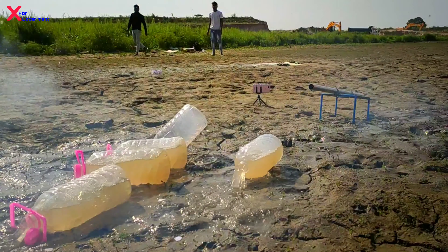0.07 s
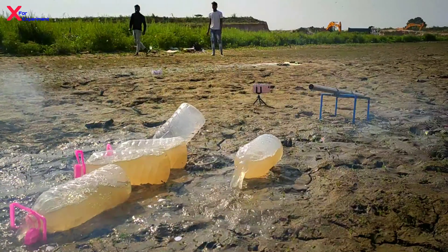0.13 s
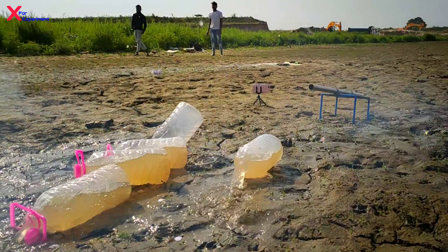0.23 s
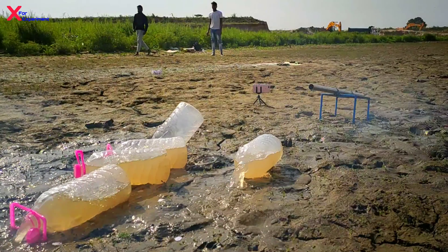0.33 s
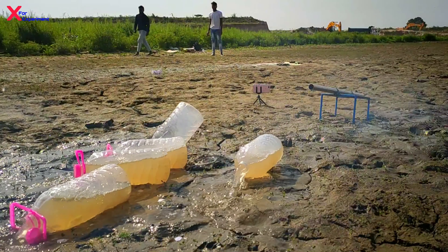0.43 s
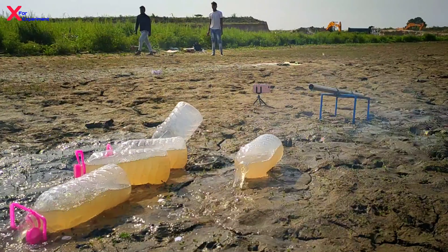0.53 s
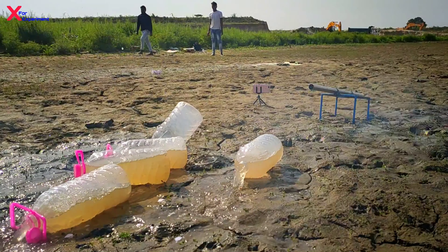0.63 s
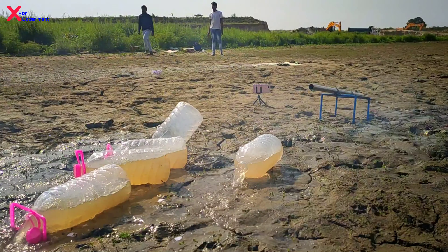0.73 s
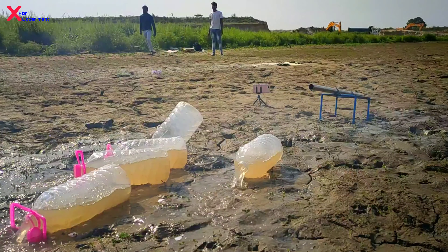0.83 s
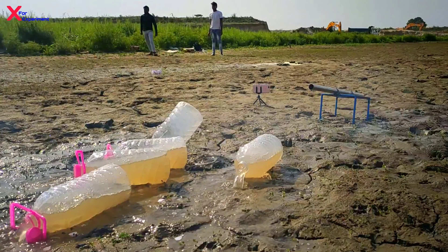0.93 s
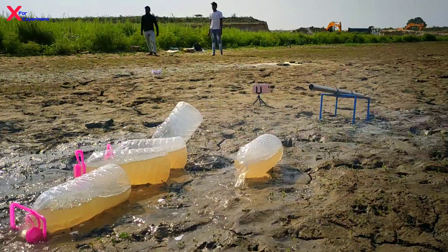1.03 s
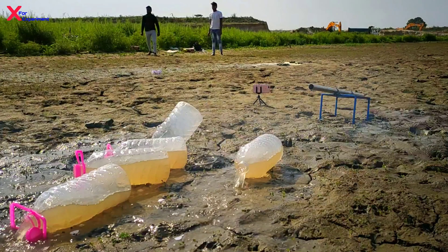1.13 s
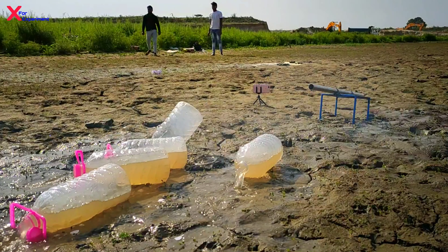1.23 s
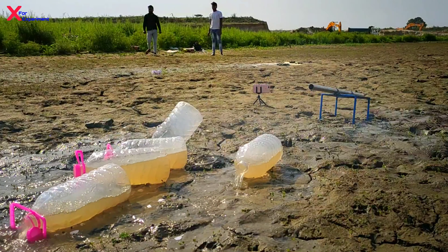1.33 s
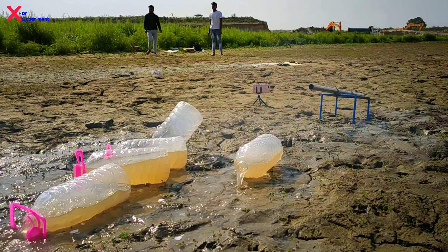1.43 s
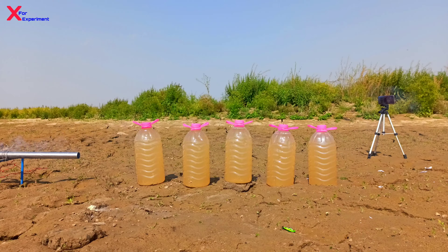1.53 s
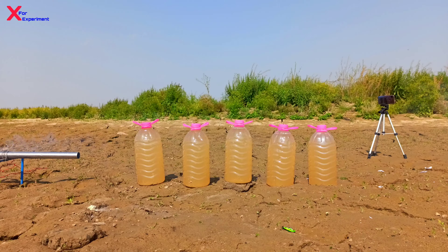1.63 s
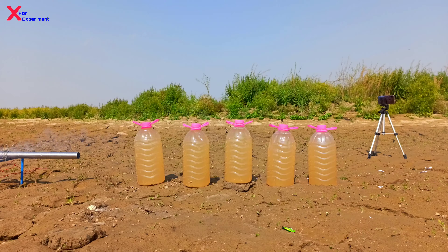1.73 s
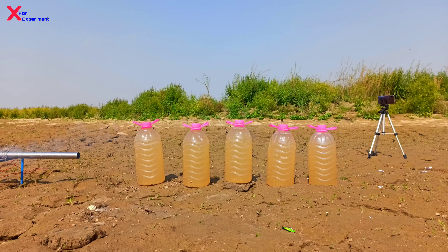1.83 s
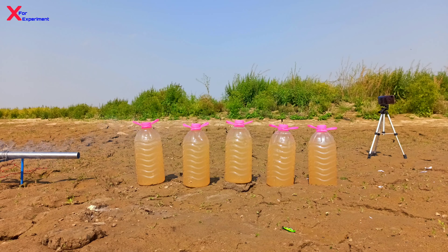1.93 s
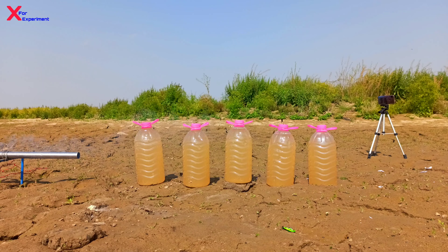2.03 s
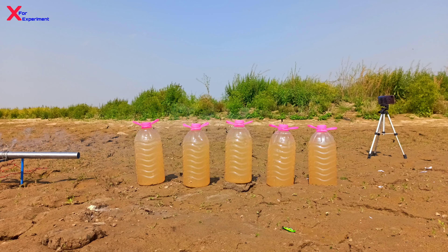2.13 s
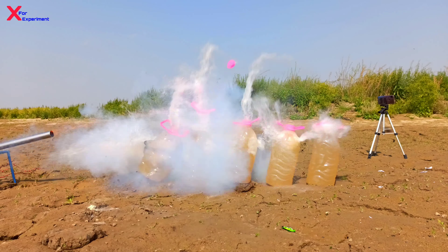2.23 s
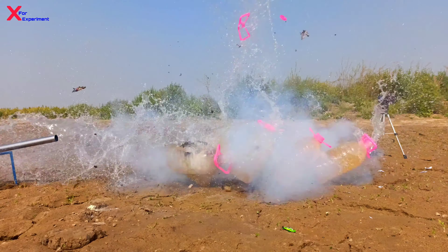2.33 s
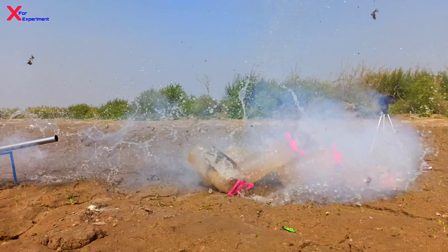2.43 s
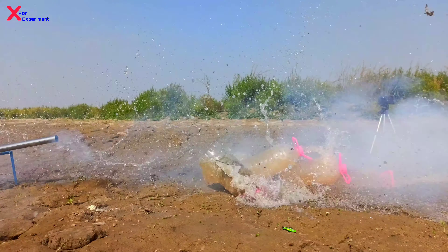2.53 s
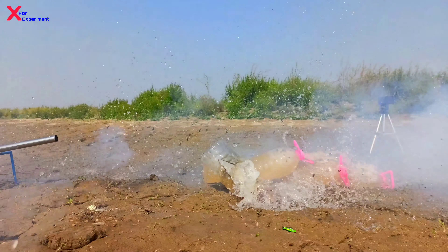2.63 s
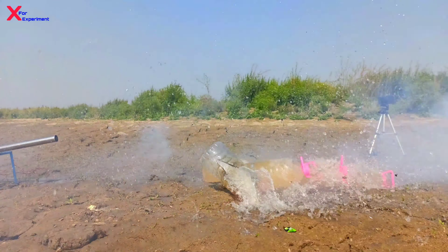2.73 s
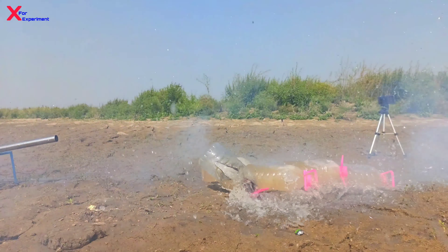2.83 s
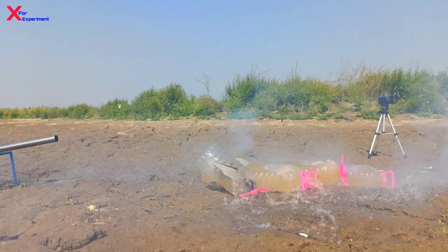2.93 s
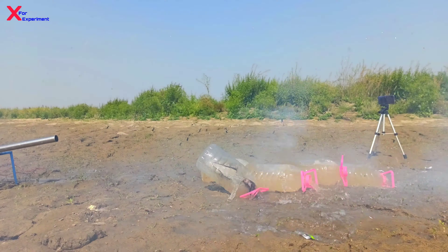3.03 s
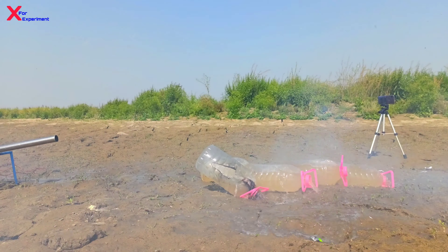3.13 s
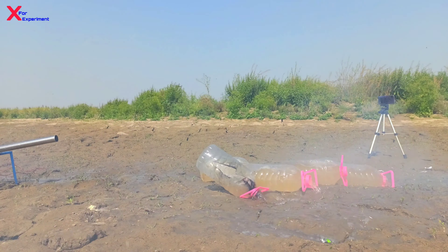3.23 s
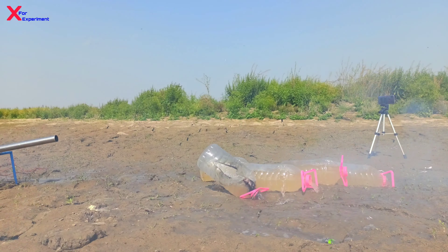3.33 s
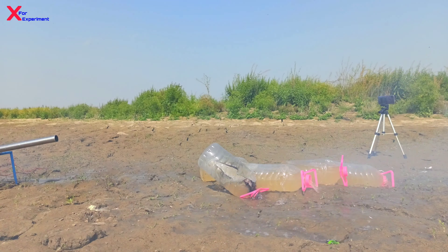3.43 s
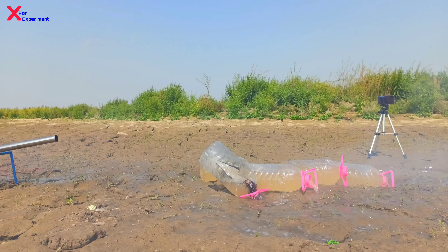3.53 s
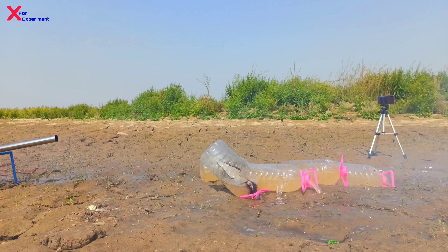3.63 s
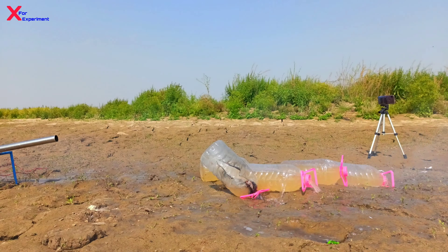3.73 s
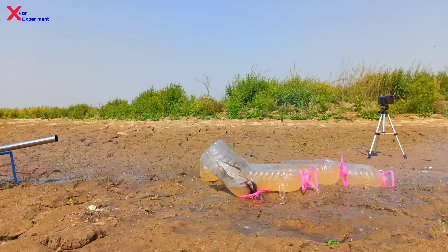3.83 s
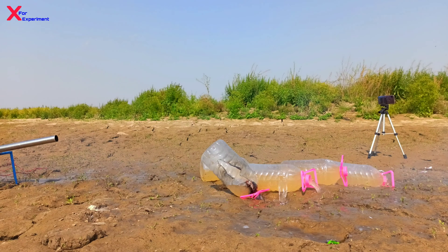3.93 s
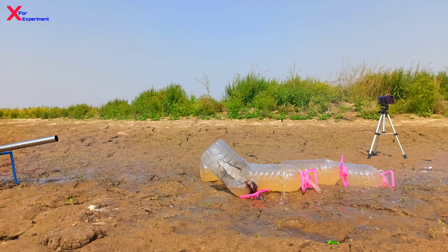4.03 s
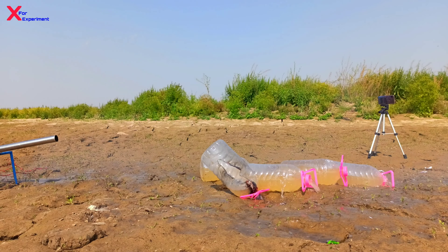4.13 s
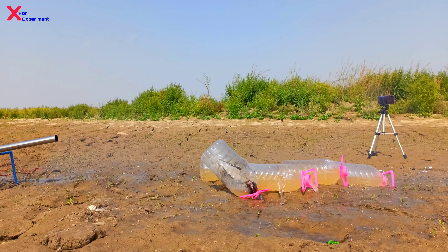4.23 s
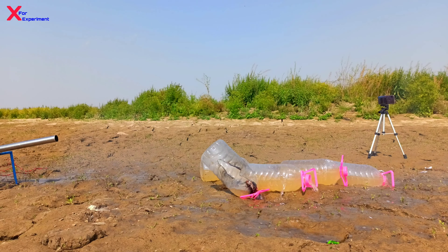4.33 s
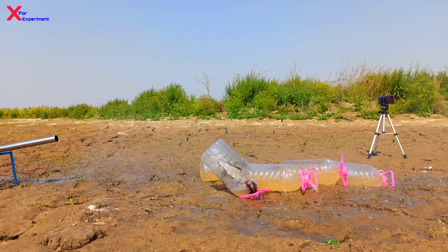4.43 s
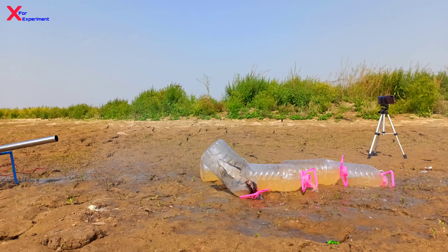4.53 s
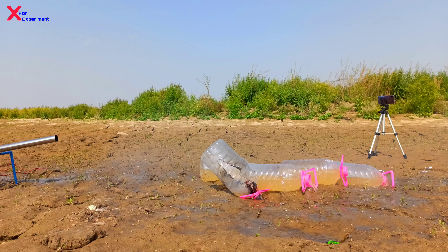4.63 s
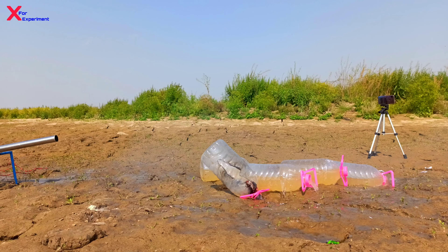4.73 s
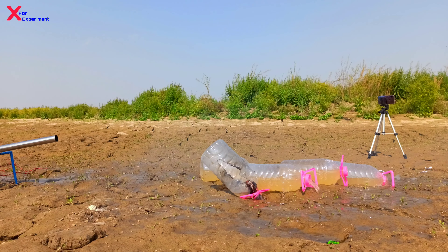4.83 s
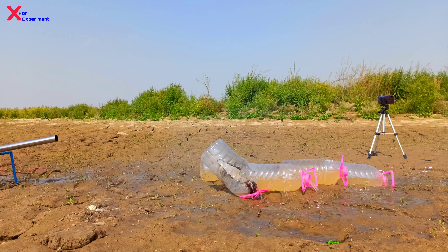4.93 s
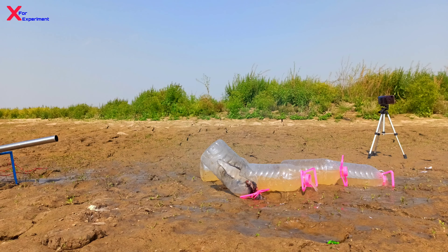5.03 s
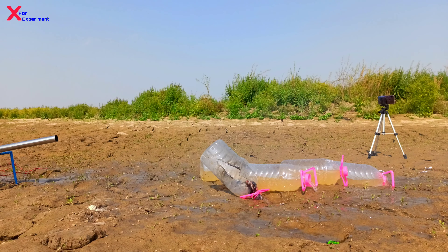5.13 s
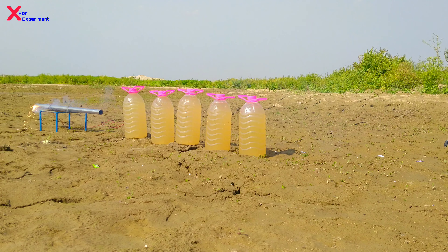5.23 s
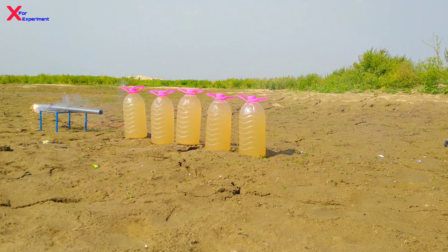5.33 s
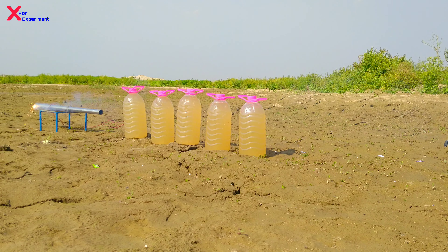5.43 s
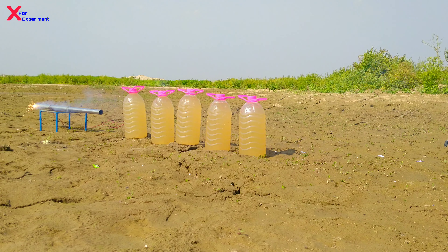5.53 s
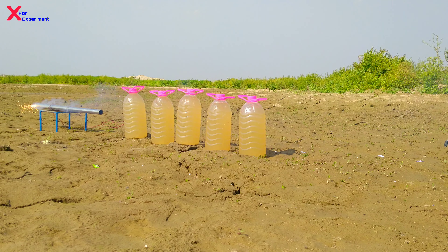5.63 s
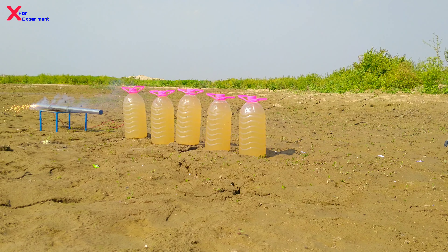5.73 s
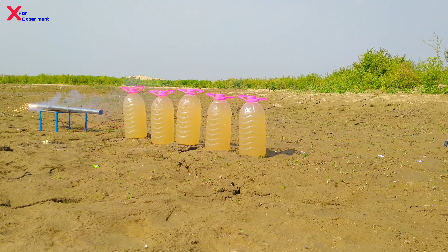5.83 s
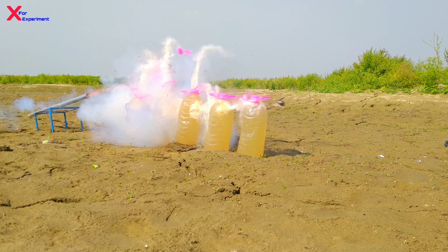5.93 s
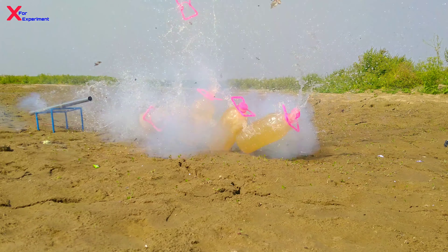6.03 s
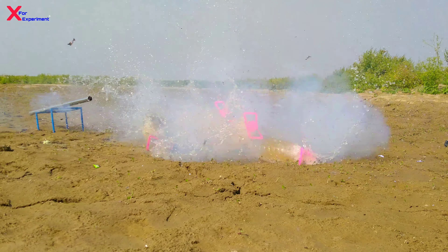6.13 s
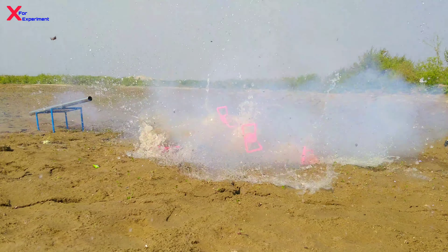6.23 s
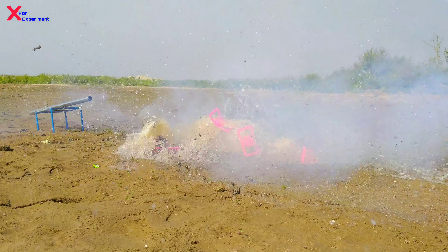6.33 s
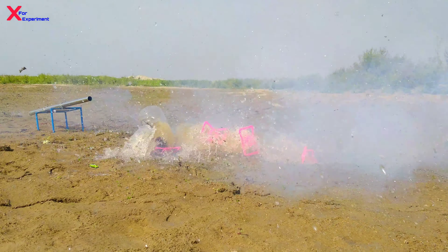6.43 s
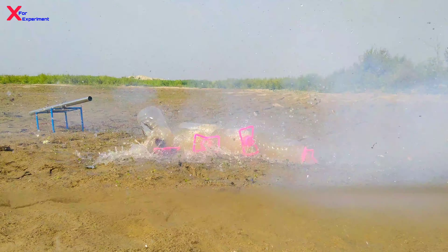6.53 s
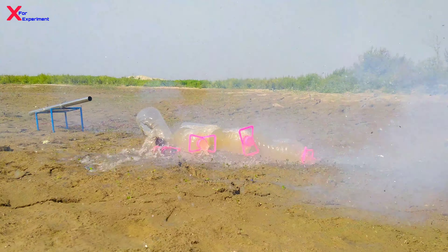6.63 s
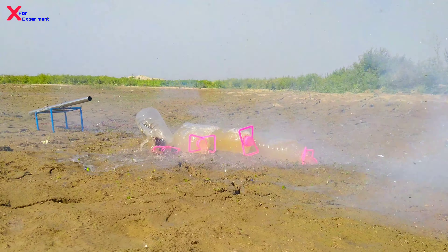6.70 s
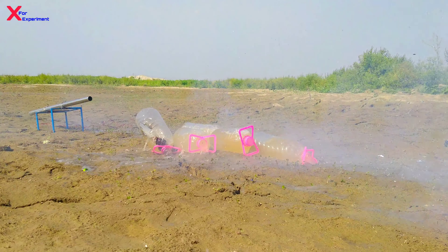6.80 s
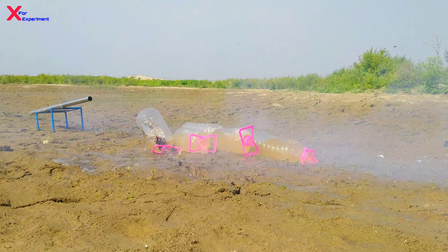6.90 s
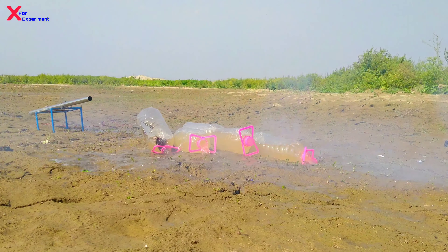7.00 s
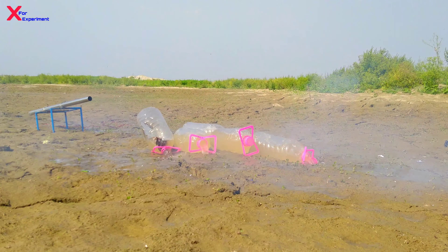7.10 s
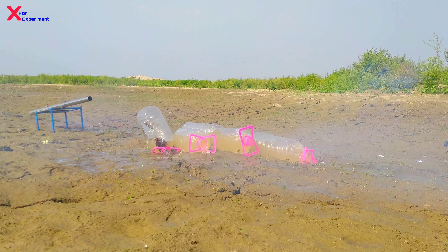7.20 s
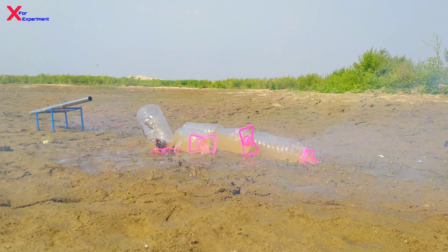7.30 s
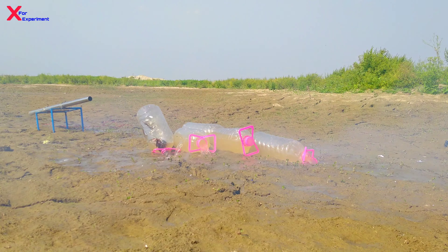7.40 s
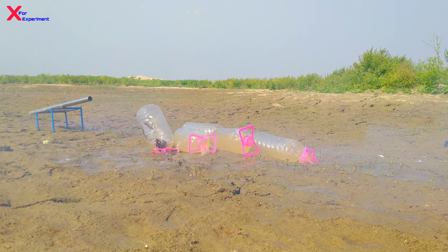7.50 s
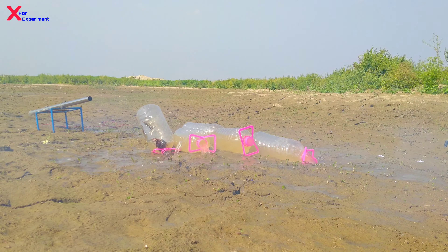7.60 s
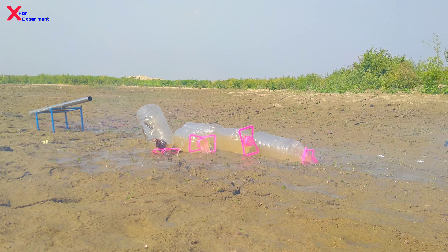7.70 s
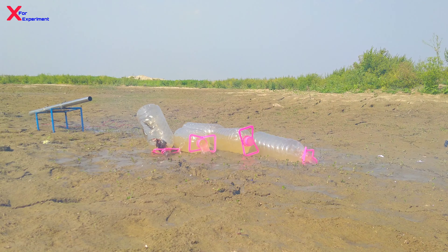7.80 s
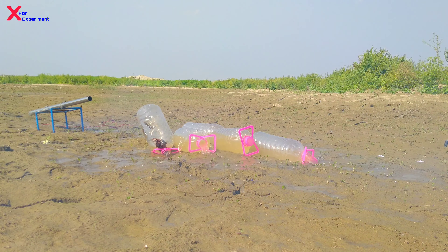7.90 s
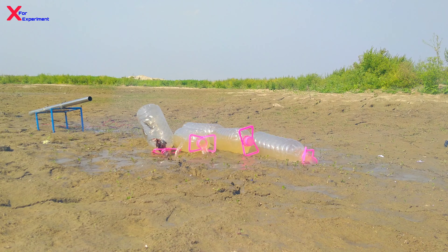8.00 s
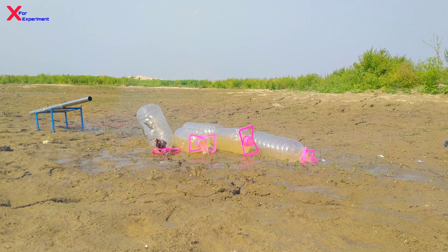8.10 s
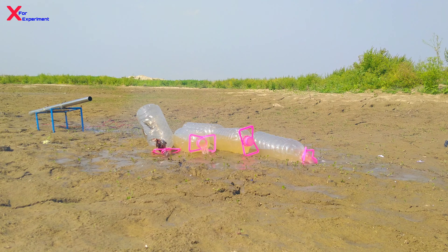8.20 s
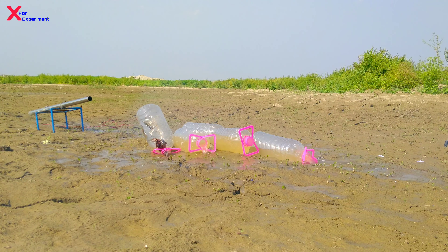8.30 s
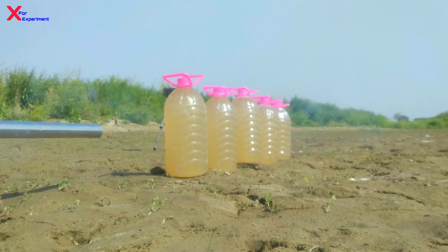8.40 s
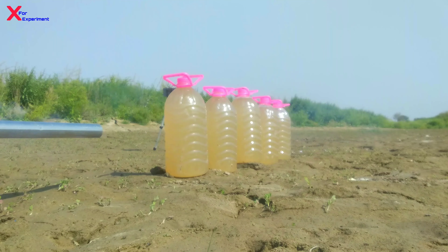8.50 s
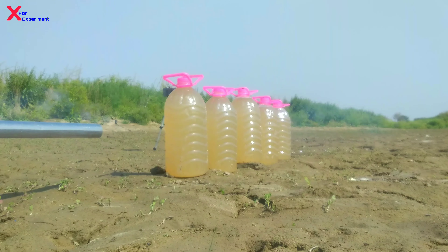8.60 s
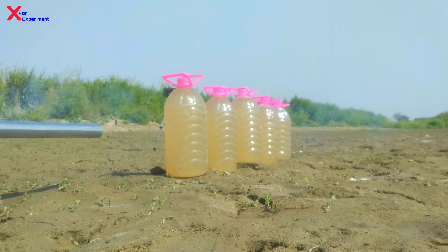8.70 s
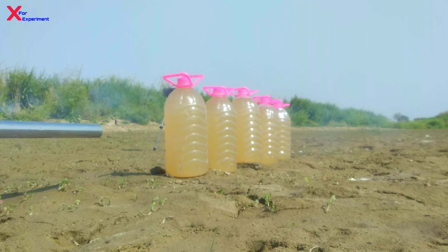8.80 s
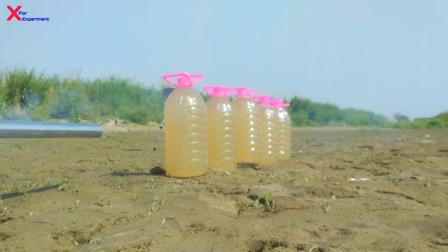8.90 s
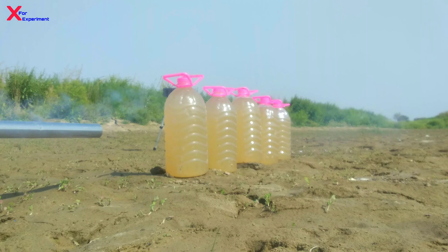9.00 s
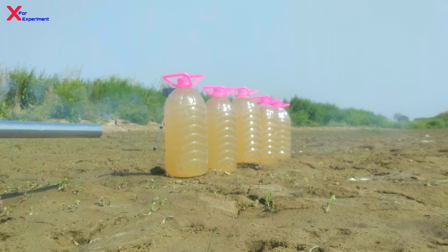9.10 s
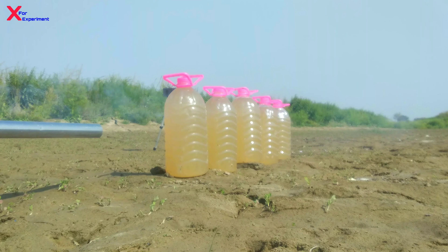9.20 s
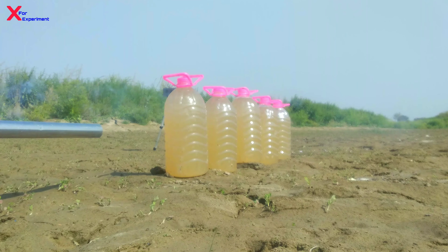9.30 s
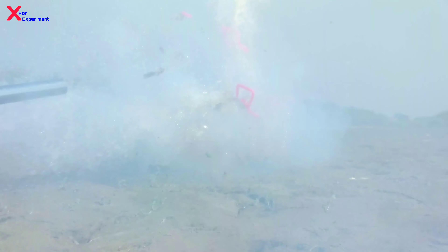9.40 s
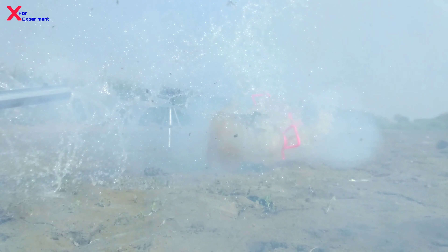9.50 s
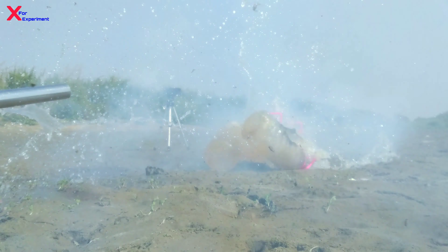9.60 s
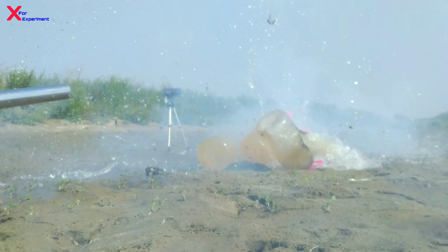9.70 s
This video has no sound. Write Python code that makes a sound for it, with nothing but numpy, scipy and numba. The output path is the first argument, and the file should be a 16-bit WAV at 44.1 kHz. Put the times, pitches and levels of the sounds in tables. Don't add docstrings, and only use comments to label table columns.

```python
import sys
import numpy as np
from scipy import signal
from scipy.fft import rfft, irfft, next_fast_len
from scipy.io import wavfile
from scipy.ndimage import uniform_filter1d
from numba import njit

SR = 44100
rng = np.random.default_rng(int(sys.argv[2]) if len(sys.argv) > 2 else 0)


def volts_from_decibels(level):
    exponent = np.asarray(level, float) / 20
    return 10 ** exponent


def transcribe(u):
    v = np.clip(np.atleast_2d(u).T, -1, 1)
    q = np.round(v * 32767).astype(np.int16)
    wavfile.write(sys.argv[1], SR, q)


N = 429975
T = np.arange(N) / SR

# start t/s, left lag/samples, bass likeness/0-1, treble likeness/0-1, corner f/Hz, treble pan/dB
PAIRS = [
    (0, 16.5, .7, .1, 1190, -1.5),
    (1.556, 5, .8, 0, 1503, -1),
    (5.2268, 0, 1, 1, 1000, 0),
    (8.452, 18.5, .8, 0.2, 1788, -4.5),
]
MONO = 2
# f/Hz, density/dB per Hz
COLOUR_DB = [
    [(12, -29), (20, 5.5), (80, -6.5), (109, -17.5), (238, -34), (565, -41), (812, -41.5), (3270, -36.5),
     (9160, -27), (15500, -32)],
    [(12, -80), (20, -54), (42, -22.5), (93, 0), (416, -20), (790, -23), (1380, -27.5), (5250, -25.5),
     (6550, -20.5), (8190, -24), (10800, -40.5), (12100, -30.5), (15500, -32)],
    [(12, -40), (20, -11), (76, 4.5), (226, -16), (315, -21.5), (352, -29.5), (405, -24), (581, -26),
     (1170, -26.5), (1770, -23.5), (5390, -27), (8190, -20.5), (10800, -24.5), (15500, -21.5)],
    [(12, -63), (20, -35.5), (85, 4), (298, -23.5), (1200, -31), (2150, -33), (4080, -40), (4830, -33),
     (5550, -37.5), (15500, -35.5)],
]
LIFT_DB = [4, 3, 10, -2]
SHOT_S = [-1.12, 2.272, 6.042, 9.424]

# on t/s, off t/s, f/Hz, level/dB
HORN = [
    (1.82, 1.963, 724, -67.5),
    (1.97, 2.104, 797, -71),
    (5.582, 5.723, 718, -72),
    (5.706, 5.866, 785, -71.5),
]
HORN_DB = [
    [-10, -12, 0, 0],
    [-10, -2, 0, -6],
    [-10, -3, 0, -14],
    [-10, 2, 0, -9],
]
# on t/s, off t/s, f/Hz, level/dB
PUMP = [
    (1.56, 2.2, 800, -72),
    (5.237, 6.0, 806, -75),
    (5.228, 6.0, 530.6, -79),
    (8.467, 9.35, 802, -66),
]
# t/s, f/Hz, level/dB
BIRD = [(1.19, 6350, -56), (1.31, 6100, -58), (4.57, 7000, -52.5), (4.67, 7110, -54), (4.72, 6460, -60),
        (4.89, 7040, -61), (5.02, 6560, -57), (5.109, 6830, -55), (6.91, 6560, -49), (7.16, 6850, -45),
        (7.4, 7250, -60), (7.58, 7000, -54)]
# t/s, level/dB
GUSTS = [(0, -44.5), (.35, -42), (.9, -31.5), (1.4, -35.5), (1.55, -47.5), (1.57, -42.5), (1.85, -59.5),
         (2.5, -74.5), (3.9, -75.5), (5.2, -76), (5.24, -54.5), (6.5, -47), (7.2, -69), (7.6, -37.5),
         (8.44, -51.5), (8.5, -65), (9.3, -68), (9.75, -68)]
WIND_PAN_DB = [7, 0, 0, 0]
# machines/dB, low/dB, middle/dB, high/dB
QUIET = [
    (-43, -55.5, -63, -66.5),
    (-46.5, -51, -59, -61.5),
    (-51, -61.5, -67.5, -74),
    (-36.5, -44, -53.5, -45.5),
]
GUST_HUM_DB = -11

# thuds/dB, splash/dB, spray/dB, shot echo/dB
DOWNPOUR = [
    (-30, -32, -35, -35),
    (-20.5, -28, -28, -30.5),
    (-33, -31.5, -34, -41),
    (-17, -29, -29.5, -23.5),
]
POUR_S, POUR_END_S, POUR_ATTACK_S, POUR_RELEASE_S = .19, .79, 0.052, .05
POUR_SAG_DB_S, ECHO_FALL_DB_S, ECHO_BRIGHT_DB = [20.5, 21, 34, 20], 10, -4
SPATTER_S, SPATTER_DB = 0.064, -9.5
# splash/dB, spray/dB
DRIZZLE = [
    (-53, -36),
    (-53.5, -45.5),
    (-56.5, -45),
    (-53, -45.5),
]
# t after shot/s, level/dB
DRIFT = [
    (.2, 3.5),
    (1.181, -1.5),
    (1.319, -8),
    (1.5, -9),
    (1.62, -6),
    (2.08, -4.5),
    (2.3, -19),
    (3, -32),
]
SPARSE_DB, DRIFT_SHARE = -10, .45

# t/s, peak level/dB, f/Hz, pan/dB
TICKS_FIRST = [(0.0303, -24.5, 10500, 0.5), (0.0672, -22.5, 10500, -6), (0.095, -29, 11100, -3.0),
               (0.109, -26.5, 12900, -5), (0.176, -21, 5010, -5.0), (0.189, -24.5, 9650, 3.0),
               (0.207, -27, 9050, -4), (0.2843, -21, 8960, 7.0), (0.3256, -23, 13700, 4),
               (0.3656, -30, 13100, 1), (0.4, -30.5, 8750, -2.5), (0.4324, -15.5, 11600, -7),
               (0.4451, -15.5, 6750, -4.5), (0.4629, -16, 9300, -6.5), (0.4976, -26.5, 10700, 0),
               (0.532, -19, 11400, 5.0), (0.6045, -28.5, 10200, -5.0), (0.6399, -28, 10100, -3.5),
               (0.6729, -37, 3500, -2.5), (0.6742, -23.5, 10000, -6), (0.6948, -22.5, 13400, -5),
               (0.7346, -29, 12200, -2.5), (0.7602, -20, 13800, -4.0), (0.818, -21, 10200, -3.5),
               (0.8405, -27.5, 8150, -3.5), (0.857, -16.5, 10800, -6.5), (0.8979, -21.5, 14000, -3.5),
               (0.9273, -20.5, 8860, -4), (0.9328, -30, 9200, 4), (0.9332, -12.5, 7260, -4),
               (0.9931, -23.5, 10600, -3), (1.043, -29, 14300, -3), (1.0633, -20, 12900, -6.5),
               (1.1115, -31, 10500, -3), (1.1164, -32, 8400, -5.5)]
# t/s, peak level/dB, pan/dB
TICKS_NEXT = [(2.479, -12, 11), (2.4996, -25.5, -3.5), (2.525, -18, -1.5), (2.6562, -22, -1),
              (2.678, -16.5, 1), (2.7316, -23.5, -2), (2.769, -18.5, 0.5), (2.8508, -18, -2.5),
              (2.9261, -21.5, -0.5), (3.0011, -25.5, -2), (3.019, -24, -1), (3.1035, -21, 3.5),
              (3.1488, -22.5, -1.5), (3.173, -33, -4.5), (3.214, -26, 1), (3.26, -36.5, 0.5),
              (3.288, -30, -0.5), (3.3317, -22.5, -6.5), (3.3671, -29.5, -3.0), (3.397, -30.5, 2),
              (3.413, -27, -6.0), (3.437, -31, 3), (3.4689, -31.5, -2.5), (3.493, -30.5, -5.0),
              (3.52, -35, -2.5), (3.5717, -31, -1), (3.628, -40, 0), (3.724, -39, 5.5), (3.7228, -29, 2.5),
              (3.794, -30.5, -5.0), (3.8215, -34.5, -4.5), (3.8346, -29.5, 0.5), (3.866, -24, -2),
              (3.8985, -35.5, -1.5), (4.0474, -32, -3.0), (4.071, -32.5, -4.5), (4.096, -32.5, -5),
              (4.2177, -37.5, -2), (4.2606, -29, -5.0), (4.3397, -31.5, -2), (4.3985, -38.5, -3.5),
              (4.441, -38.5, -3.5), (4.4731, -38.5, -1), (4.486, -33.5, -1.5)]
# t/s, peak level/dB
TICKS_MONO = [(6.3512, -23), (6.3672, -16), (6.5313, -19), (6.5812, -27.5), (6.6206, -18), (6.6874, -27),
              (6.7089, -25), (6.7269, -25), (6.8281, -22), (6.8631, -26.5), (6.9164, -26.5), (6.9284, -25),
              (6.9828, -30), (7.0122, -28.5), (7.0546, -23.5), (7.0671, -22), (7.1135, -22),
              (7.1334, -29.5), (7.1519, -21), (7.1818, -17.5), (7.2242, -26.5), (7.2337, -26),
              (7.2606, -26.5), (7.3135, -26.5), (7.3435, -28), (7.3749, -38.5), (7.3749, -26),
              (7.533, -34.5), (7.561, -26), (7.5879, -33), (7.6024, -26.5), (7.6328, -22), (7.7555, -29.5),
              (7.7855, -28.5), (7.8074, -23), (7.8368, -25), (7.8603, -21.5), (7.9027, -28), (7.9566, -28),
              (7.991, -33), (8.0254, -24), (8.0474, -27.5), (8.0678, -28), (8.1631, -28)]
PLAIN_HZ = [7000, 12500]
TICK_DB, TICK_FOCUS = -0.5, 0.81
SMALL_PER_S, SMALL_DB, SMALL_SPREAD_DB, SMALL_PAN_DB = 80, -33, 4, -4

# t/s, peak level/dB, f/Hz
GLUGS = [(1.12, -37, 1360), (3.298, -23, 736), (4.261, -45, 533), (4.409, -42, 560), (4.556, -43, 580),
         (4.692, -39.5, 620), (4.85, -45.5, 850), (7.071, -40, 749), (8.036, -42, 1105),
         (8.288, -42.5, 1330)]
# t/s, peak level/dB, f/Hz, pan/dB
HITS = [(.1755, -26, 4930, -5), (.432, -34.5, 3440, -.5), (.4633, -28, 3740, -6), (.6459, -35, 2230, -4),
        (.857, -30, 4780, -3.5), (.934, -30, 2930, -3), (1.606, -45, 1170, 4), (2.4428, -23, 905, -.5),
        (2.5257, -19, 1102, -1.5), (2.548, -19, 1883, -2), (2.572, -16, 800, -.5), (3.2854, -32, 1140, 0),
        (4.0467, -33, 2620, -3), (4.2604, -36.5, 1100, 1), (4.4852, -31, 4640, -1.5), (6.266, -20, 1300, 0),
        (6.2726, -17, 1600, 0), (6.425, -25, 2180, 0), (6.514, -27, 1300, 0), (6.584, -24, 1400, 0),
        (6.687, -22, 2050, 0), (6.722, -33, 900, 0), (6.621, -19, 2500, 0), (9.157, -34, 2300, 0),
        (9.158, -34, 8000, 0), (5.45, -50, 1500, 0), (9.64, -20, 1200, 4), (9.688, -21, 900, 7),
        (9.723, -21, 1100, 3.5), (9.5272, -14.5, 1358, -10), (9.5896, -24, 1689, 6), (9.624, -25, 2180, 5)]
# t/s, peak level/dB, f/Hz
DRIPS = [(6.8277, -27.5, 2830), (6.8584, -40.5, 2106), (6.9545, -34, 2510), (7.0023, -40, 1225),
         (7.0548, -37, 1166), (7.1046, -35, 3750), (7.1323, -38, 2950), (7.165, -31.5, 3660),
         (7.1819, -45.5, 1000), (7.3431, -30.5, 2290), (7.4156, -43, 2310), (7.481, -42.5, 1124),
         (7.5135, -40.5, 2380), (7.6012, -41.5, 1250), (7.6142, -32, 2664), (7.6329, -37, 1700),
         (7.7746, -40, 1487), (7.812, -30.5, 2285), (7.837, -43.5, 2710), (8.035, -43.5, 1134),
         (8.256, -43, 2430), (8.2898, -44.5, 1420)]
# t after shot/s, peak level/dB, f/Hz
SLOPS = [
    (.403, -18.5, 800),
    (0.488, -19.5, 750),
    (.581, -8, 800),
    (.645, -14, 1200),
    (0.722, -24.5, 950),
]
SLOP_DB = {1: -2, 2: -10}
SLOP_PITCH = {1: 1, 2: 1.25}
SLOP_LATE_S = {1: -.002, 2: 0}
SLOP_RISE_S = 0.0061
THUD_DB, THUD_DB_PER_OCTAVE, HEAVY_HZ, LIGHT_DB = 6.5, -20, 1000, -30

# t/s, peak level/dB, f/Hz
THUMPS = [(2.376, -12, 202), (2.408, -17, 210), (2.443, -14, 250), (2.475, -18, 213), (2.543, -21, 213),
          (2.579, -13, 300), (2.672, -22, 234), (2.762, -18, 420), (2.854, -18, 327), (2.983, -21, 199),
          (3.07, -25.5, 130), (6.118, -15, 310), (6.165, -15, 285), (6.197, -17, 250), (9.15, -28, 120),
          (9.476, -3.5, 149), (9.503, -4.5, 191), (9.566, -8, 178), (9.602, -10, 169), (9.691, -23, 400),
          (9.725, -13, 300)]
THUMP_CYCLES = 1.4
# t/s, first f/Hz, last f/Hz, sink t/s, level/dB, fall/dB per s
HOLLOW = [
    (2.3, 340, 199.4, 0.08, -14, 100),
    (6.075, 327, 240, 0.08, -25, 60),
    (9.44, 329, 171.4, 0.055, -16, 91),
]
HOLLOW_SHARE = 0.28
# t/s, f/Hz, width f/Hz, level/dB, fall/dB per s
BARREL = [
    (2.31, 6300, 400, -24, 130),
    (9.46, 6400, 450, -19, 110),
    (9.46, 4300, 300, -27, 150),
]

# f/Hz, level/dB
CRACK_DB = [
    [(290, -29), (500, -6.5), (2650, -19), (4320, -15.5), (4850, -28), (6950, -13.5), (10400, -34),
     (15500, -19)],
    [(290, -37.5), (500, -14.5), (781, -1), (2230, -5), (5140, -19), (15500, -18)],
    [(290, -27.5), (500, -4.5), (1430, -9), (1580, -12.5), (9260, -19.5), (15500, -22)],
]
# t/s, level/dB, hold t/s, tail/dB per s
BURSTS = [
    (2.274, -6, 0.037, 212),
    (6.049, -18.5, .028, 115),
    (9.424, -4.5, 0.017, 205.5),
]
# length t/s, level under burst/dB, rise/dB per s, muzzle report lead t/s
LEADS = [
    (.08, 24, 170, 0.0097),
    (.078, 22, 248, 0.0088),
    (.085, 15, 130, 0.018),
]
# t/s, first f/Hz, last f/Hz, sink t/s, bandwidth share, ground thump/dB
BOOMS = [
    (2.27, 340, 200, 0.081, 0.5, 3),
    (6.05, 540, 209, 0.033, 1, -8),
    (9.42, 330, 170, 0.046, 0.55, 2),
]
# level/dB, held back in crack/dB, fall/dB per s, end t/s
BOOM_LEVELS = [
    (-10.5, 0, 230, 0.15),
    (-24, 5, 49.5, 0.25),
    (-11.5, -0.5, 90.5, 0.18),
]
ATTACK_S, DROP_S, DROP_DB = 0.0034, 0.011, 10
REPORT_DB, LEAD_BOOM_DB = 8, -6
THUMP_LOOSE = .35
# t/s, level/dB, f/Hz, decay t/s, rise t/s
SWINGS = [
    (2.262, -3, 61.7, 0.012, 0.0049),
]
FRONT_S = 6.0493
# level/dB, build-up t/s, undershoot/dB, its decay t/s
FRONT = (-9, .0022, -9, .0004)
# push/dB, lasts t/s, suck/dB, recovery t/s
SURGE = (-11, .11, -16.5, .4)

# t/s, level/dB, right re left/ratio
SPLICES = [
    (1.556, -21.5, -3),
    (5.229, -25, 2.5),
    (8.4535, -27, 2.5),
]
# from t/s, to t/s, low f/Hz, high f/Hz, 1 = side signal too
DEAF = [(1.58, 2.25, 8800, 11500, 1), (2.335, 5.22, 8800, 9700, 1), (2.335, 5.22, 9700, 10600, 1),
        (2.32, 5.22, 10600, 11500, 1), (8.49, 9.38, 1100, 1400, 0), (8.49, 9.35, 3900, 4250, 0),
        (8.47, 9.32, 5750, 6300, 0), (9.5, 9.58, 6900, 7600, 1), (8.6, 9.15, 2600, 2850, 0),
        (8.85, 9.11, 2950, 3150, 0), (9.51, 9.59, 5600, 6000, 1), (9.54, 9.59, 4950, 5250, 1)]
# from t/s, to t/s, count, top f/Hz
DROPOUTS = [
    (0, 1.5, 60, 7000),
    (3.0, 5.2, 70, 6000),
    (8.5, 9.3, 30, 8000),
    (9.47, 9.66, 14, 9000),
]
HISS_DB, TOP_HZ = -84, 15650


def level(x):
    return x / np.sqrt(np.mean(x ** 2) + 1e-30)


def shape(x, gain):
    size = next_fast_len(x.shape[-1])
    f = np.arange(size // 2 + 1) * SR / size + 1
    return irfft(rfft(x, size) * gain(f), size)[..., :x.shape[-1]]


def tint(points):
    hz, db = np.transpose(points)
    return lambda f: volts_from_decibels(np.interp(np.log(f), np.log(hz), db))


def band(lo_hz, hi_hz, order=4):
    return lambda f: 1 / np.sqrt((1 + (lo_hz / f) ** (2 * order)) * (1 + (f / hi_hz) ** (2 * order)))


def gate(on, off, edge):
    return np.clip(np.minimum(T - on, off - T) / edge, 0, 1)


def power_sum(*db):
    return np.sqrt(sum(volts_from_decibels(d) ** 2 for d in db))


def walk(n, rate):
    k = int(SR / rate)
    return uniform_filter1d(np.repeat(rng.standard_normal(n // k + 1), k), k)[:n]


@njit
def add(out, start, hz, cycles, size, glide):
    for k in range(len(start)):
        n = int(5 * cycles[k] * SR / hz[k])
        w, z = 2 * np.pi * hz[k] / SR, size[k] + 0j
        for i in range(start[k], min(start[k] + n, len(out))):
            z *= np.exp(1j * w - hz[k] / SR / cycles[k])
            w = min(w * (1 + glide / n), 3.)
            out[i] += z.imag


@njit
def svf(x, hz, share):
    y, b, l = np.empty(len(x)), 0., 0.
    for i in range(len(x)):
        g = np.tan(np.pi * hz[i] / SR)
        v = (b + g * (x[i] - l)) / (1 + g * (g + share))
        b, l, y[i] = 2 * v - b, l + 2 * g * v, share * v
    return y


def microphone(k):
    colour = tint(COLOUR_DB[k])
    return lambda f: colour(f) * volts_from_decibels(LIFT_DB[k] / (1 + ((f - 15000) / 2500) ** 2))


def pair(source, k, loose=0.):
    _, lag, bass, treble, corner_hz, _ = PAIRS[k]
    shared = source()
    if k == MONO:
        return np.array([shared, shared])
    like = lambda f: np.clip(treble + (bass - treble) / (1 + (f / corner_hz) ** 2) - loose, 0, 1)
    late = lambda f: np.exp(-2j * np.pi * f * lag / SR)
    left = shape(shared, lambda f: late(f) * np.sqrt(like(f)))
    right = shape(shared, lambda f: np.sqrt(like(f)))
    own = shape(np.array([source(), source()]), lambda f: np.sqrt(1 - like(f)))
    return np.array([left, right]) + own


def far():
    out = np.zeros(N)
    for (on, off, hz, db), partials in zip(HORN, HORN_DB):
        note = sum(volts_from_decibels(db + p) * np.sin(2 * np.pi * (k + 1) * hz * T) for k, p in enumerate(partials))
        out += gate(on, off, 0.0097) * note
    for on, off, hz, db in PUMP:
        out += gate(on, off, .005) * volts_from_decibels(db + 4.4 * walk(N, 20)) * np.sin(2 * np.pi * hz * T)
    for s, hz, db in BIRD:
        t = np.clip(T - s, 0, .055)
        swell = np.sin(np.pi * t / .055)
        out += volts_from_decibels(db) * walk(N, 700) * swell * np.sin(2 * np.pi * hz * (t - 2.4 * t ** 2))
    return out


def drift(t):
    return np.where(t > POUR_S, np.interp(t, *np.transpose(DRIFT)), -np.inf)


def drops(n, rate, lo_hz, hi_hz, cycles, spread_db):
    u = rng.random((int(4000 * n / SR), 3))[:int(rate * n / SR)].T
    out = np.zeros(n)
    hz = lo_hz * (hi_hz / lo_hz) ** u[1]
    size = volts_from_decibels(-spread_db * np.log(1.002 - u[2]))
    add(out, (u[0] * n).astype(np.int64), hz, cycles + 0 * u[0], size, .3)
    return level(out)


def surroundings(k, a, b):
    n, colour, t = b - a, microphone(k), T[a:b] - SHOT_S[k]
    (machine_db, low, middle, high), (thud, big, fine, echo) = QUIET[k], DOWNPOUR[k]

    edge = np.clip(np.minimum((t - POUR_S) / POUR_ATTACK_S, (POUR_END_S - t) / POUR_RELEASE_S), .001, 1)
    edge = np.maximum(edge, volts_from_decibels(SPATTER_DB) * (t > SPATTER_S) * (t < 2 * POUR_S))
    pour_db = 20 * np.log10(edge) - POUR_SAG_DB_S[k] * (t - POUR_S) * (t > 0)
    echo_db = np.where(t > .05, echo - ECHO_FALL_DB_S * t, -120)
    wind_db = np.interp(T[a:b], *np.transpose(GUSTS))
    spray_gain = power_sum(high, fine + pour_db, DRIZZLE[k][1] + drift(t))
    splash_gain = power_sum(middle, big + pour_db, DRIZZLE[k][0] + DRIFT_SHARE * drift(t))

    wet = np.clip((t - POUR_S) / 0.029, 0, 1) * np.clip((-21 - 20 * np.log10(spray_gain)) / 16, .3, 1)
    wet *= np.clip(2 * volts_from_decibels(drift(t)) / volts_from_decibels(SPARSE_DB), 0, 1)
    patter = volts_from_decibels(2.8 * wet * walk(n, 75))

    noise = lambda rate, db: rng.standard_normal(n) * volts_from_decibels(db * walk(n, rate))
    big_drops = lambda: noise(30, 1.5) + .75 * wet * drops(n, 500, 800, 4000, 1.5, 2.5)
    fine_drops = lambda: noise(60, 2.0) + .9 * wet * drops(n, 300, 9000, 20000, .4, 2.8)
    layer = lambda source, lo, hi: level(shape(pair(source, k), lambda f: colour(f) * band(lo, hi)(f)))
    wind = layer(lambda: noise(2.7, 2.9), 8, 50)
    machines = layer(lambda: noise(30, 3.5), 60, 170)
    thuds = layer(lambda: patter ** .5 * noise(30, 1.8), 180, 900)
    splash = layer(lambda: patter * big_drops(), 900, 3500)
    spray = layer(lambda: patter * fine_drops(), 3200, 20000)

    side = np.array([[.5], [-.5]]) * (k != MONO)
    bass = wind * volts_from_decibels(wind_db + side * WIND_PAN_DB[k])
    bass += machines * power_sum(machine_db, echo_db, wind_db + GUST_HUM_DB)
    bass += thuds * power_sum(low, thud + pour_db, echo_db + ECHO_BRIGHT_DB)
    return bass + (splash * splash_gain + spray * spray_gain) * volts_from_decibels(side * PAIRS[k][5])


def scene_changes():
    out = np.zeros((2, N))
    for s, db, sign in SPLICES:
        tick = np.sinc((T - s) * 2 * 12000) * np.exp(-abs(T - s) / 0.00048)
        out -= volts_from_decibels(db) * np.array([[1], [sign]]) * np.sign(sign) * tick
    return out


def glugs():
    out = np.zeros(N)
    s, db, hz = np.transpose(GLUGS)
    for late, ratio in ((0, 1), (.004, 1.07)):
        start = ((s + late) * SR).astype(np.int64)
        add(out, start, hz * ratio, 0.055 * hz / np.log(1000), volts_from_decibels(db - 1.5), .08)
    return out


def small_drops():
    u, starts = rng.random((800, 4))[:int(SMALL_PER_S * N / SR)], [p[0] for p in PAIRS]
    s = u[:, 0] * N / SR
    k = np.searchsorted(starts, s) - 1
    thin_db = drift(s - np.take(SHOT_S, k))
    keep = (u[:, 1] < volts_from_decibels(2 * thin_db)) & (thin_db > SPARSE_DB)
    db = SMALL_DB + SMALL_SPREAD_DB * (2 * u[:, 2] - 1)
    hz = 5000 + 9000 * (7 * u[:, 2] % 1)
    pan_db = (SMALL_PAN_DB + 10 * (u[:, 3] - .5)) * ~(k == MONO)
    return list(np.transpose([s, db, hz, pan_db])[keep])


def ticks():
    out, starts, t = np.zeros((2, N + 512)), [p[0] for p in PAIRS], T[:512]
    plain = [(s, db, PLAIN_HZ[not pan_db], sum(pan_db)) for s, db, *pan_db in TICKS_NEXT + TICKS_MONO]
    for s, db, hz, pan_db in TICKS_FIRST + plain + small_drops():
        colour = microphone(np.searchsorted(starts, s) - 1)
        focus = lambda f: 1 / (1 + (TICK_FOCUS * np.log(f / hz)) ** 2)
        snap = rng.standard_normal(512) * np.exp(-abs(t - .001) / np.where(t < .001, .0001, .0005))
        snap = shape(snap, lambda f: colour(f) * band(2500, 15600, order=2)(f) * focus(f))
        i = max(int((s - .001) * SR), 0)
        gain = volts_from_decibels(db + TICK_DB + np.array([[.5], [-.5]]) * pan_db)
        out[:, i:i + 512] += gain * snap / abs(snap).max()
    return out[:, :N]


def landings():
    slops = [(SHOT_S[k] + s + SLOP_LATE_S[k], db + SLOP_DB[k], hz * SLOP_PITCH[k])
             for k in SLOP_DB for s, db, hz in SLOPS]
    return HITS + DRIPS + slops


def hits():
    out, t = np.zeros((2, N + 4096)), T[:4096]
    for s, db, hz, *pan_db in landings():
        thud_db = THUD_DB + THUD_DB_PER_OCTAVE * max(np.log2(hz / HEAVY_HZ), 0) + min(db - LIGHT_DB, 0)
        u, pan_db = rng.standard_normal((2, 4096)), sum(pan_db)
        t60_s = .008 + 22 / hz
        rise_s = SLOP_RISE_S * (HEAVY_HZ / hz) ** 2
        fall = np.exp(-np.log(1000) * t / t60_s) * (1 - np.exp(-t / rise_s)) ** 2
        focus = lambda f: 0.081 + 1 / (1 + (3.1 * np.log(f / hz)) ** 2)
        tick = shape(u[0] * fall, lambda f: band(900, 15500)(f) * focus(f))
        thud = shape(u[1] * fall ** .5, band(200, 900, order=2))
        sound = volts_from_decibels(db) * tick / abs(tick).max() + volts_from_decibels(db + thud_db) * thud / abs(thud).max()
        mono = PAIRS[MONO][0] < s < PAIRS[MONO + 1][0]
        lag = 0 if mono else max(int(12.5 - 2 * pan_db), 0)
        i = int(s * SR)
        out[0, i + lag:i + 4096] += sound[:4096 - lag] * volts_from_decibels(pan_db / 2 * (not mono))
        out[1, i:i + 4096] += sound * volts_from_decibels(-pan_db / 2 * (not mono))
    return out[:, :N]


def rings():
    out = np.zeros((2, N))
    for k, (s, first, last, sink, db, fall) in enumerate(HOLLOW):
        a = int(s * SR)
        t = T[:min(SR // 2, N - a)]
        hz = last + (first - last) * np.exp(-t / sink)
        once = lambda x: svf(x, hz, 1. * HOLLOW_SHARE)
        tone = lambda: once(once(rng.standard_normal(len(t))))
        out[:, a:a + len(t)] += level(pair(tone, k + 1)) * volts_from_decibels(db - fall * t) * np.clip(t / .015, 0, 1)
    for s, hz, width, db, fall in BARREL:
        a, t = int(s * SR), T[:SR // 4]
        steel = shape(rng.standard_normal((2, len(t))), band(hz - width / 2, hz + width / 2, order=30))
        out[:, a:a + len(t)] += level(steel) * volts_from_decibels(db - fall * t)
    s, db, hz = np.transpose(THUMPS)
    start, cycles = (s * SR).astype(np.int64), THUMP_CYCLES + 0 * hz
    wide = (s < PAIRS[MONO][0]) | (s > PAIRS[MONO + 1][0])
    lag = np.where(s > 9, 17, 6) * wide
    add(out[1], start, hz, cycles, volts_from_decibels(db), -.3)
    add(out[0], start + lag, (1 + .18 * wide) * hz, cycles, volts_from_decibels(db), -.3)
    return shape(out, band(80, 15000, order=2))


def surge():
    t, (push_db, lasts, suck_db, recovers) = np.maximum(T - FRONT_S, 0), SURGE
    push = volts_from_decibels(push_db) * np.exp(-(t / lasts) ** 2)
    suck = volts_from_decibels(suck_db) * np.exp(-t / recovers)
    return (push - suck) * (1 - np.exp(-t / 0.011))


def pressure():
    out = np.zeros(N)
    for t0, db, hz, decay, rise in SWINGS:
        t = np.maximum(T - t0, 0)
        out += volts_from_decibels(db) * np.sin(2 * np.pi * hz * t) * np.exp(-t / decay) * (1 - np.exp(-t / rise))
    (db, build, under_db, back), away = FRONT, abs(T - FRONT_S)
    return out + np.where(T < FRONT_S, volts_from_decibels(db) * np.exp(-away / build), -volts_from_decibels(under_db) * np.exp(-away / back))


def blasts():
    out = np.zeros((2, N))
    for k, (crack, (t0, first, last, sink, share, thump_db)) in enumerate(zip(CRACK_DB, BOOMS)):
        (on, db, hold, tail), (lead, under, rise, ahead) = BURSTS[k], LEADS[k]
        low, late, fall, lasts = BOOM_LEVELS[k]
        s = on + np.array([-lead, -ahead - ATTACK_S, -ahead, -ATTACK_S, ATTACK_S, hold, hold + DROP_S, lasts])
        start = db - under - np.array([rise * lead, 0, -REPORT_DB, -REPORT_DB])
        crack_db = [*start, db, db, db - DROP_DB, db - DROP_DB - tail * (lasts - hold)]
        boom_db = [*(start + LEAD_BOOM_DB), low - late, low - late, low, low - fall * (lasts - hold)]
        a, b = int((s[0] - .004) * SR), int((s[-1] + 0.097) * SR)
        n, t = b - a, T[a:b]
        hz = last + (first - last) * np.exp(-np.maximum(t - t0, 0) / sink)
        noise = lambda: rng.standard_normal(n)
        gas = pair(lambda: svf(noise(), hz, 1. * share), k + 1)
        ground = pair(noise, k + 1, loose=THUMP_LOOSE)
        torn = pair(lambda: noise() * volts_from_decibels(1.0 * walk(n, 300)), k + 1)
        boom = level(shape(gas, band(70, 1100, order=3)))
        boom += volts_from_decibels(thump_db) * level(shape(ground, band(93, 160, order=3)))
        hiss = level(shape(torn, tint(crack)))
        fade = np.clip((T[b] - t) / 0.069, 0, 1) * np.clip((t - T[a]) / 0.0069, 0, 1)
        both = boom * volts_from_decibels(np.interp(t, s, boom_db)) + hiss * volts_from_decibels(np.interp(t, s, crack_db))
        out[:, a:b] = fade * both
    return out + pressure()


def scene():
    cuts = [int(p[0] * SR) for p in PAIRS] + [N]
    out = np.hstack([surroundings(k, cuts[k], cuts[k + 1]) for k in range(len(PAIRS))])
    out += far() + scene_changes() + glugs()
    return out + ticks() + hits() + rings() + surge() + blasts()


def dropouts():
    rows = []
    for on, off, count, top_hz in DROPOUTS:
        for u in rng.random((count, 3)):
            s, hz = on + u[0] * (off - on), 1500 * (top_hz / 1500) ** u[1]
            end = min(s + .03 + .05 * u[2] ** 2, N / SR)
            rows.append((s, end, hz, hz + 110 + .025 * hz, 1))
    return rows


def top_cut(x):
    return signal.sosfilt(signal.butter(12, 15690, fs=SR, output="sos"), x)


def record(dry):
    dry = shape(dry, band(1.0, TOP_HZ, order=60))
    hiss = volts_from_decibels(HISS_DB) * level(np.diff(rng.standard_normal(N + 1)))
    mid, side = (dry[0] + dry[1]) / 2 + hiss, (dry[0] - dry[1]) / 2
    for on, off, lo_hz, hi_hz, both in DEAF + dropouts():
        a, b = int(on * SR), int(off * SR)
        slip = np.clip(6 * (1.15 - walk(b - a, 24) * (2 < on < 3)), .3, 1)
        lost = gate(on, off, .01)[a:b] * slip
        for part in (mid, side)[:1 + int(both)]:
            part[a:b] -= lost * shape(part[a:b], lambda f: 1. * (f > lo_hz) * (f < hi_hz))
    return top_cut(np.clip([mid + side, mid - side], -1, 1))


dry = scene()
out = record(dry)
transcribe(out)
```